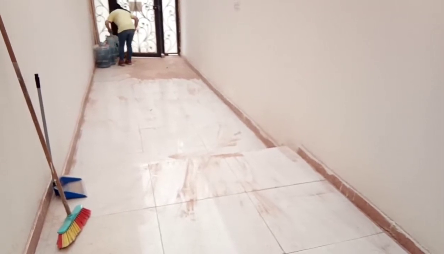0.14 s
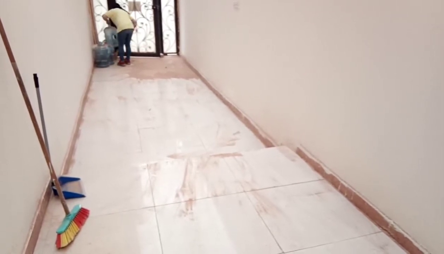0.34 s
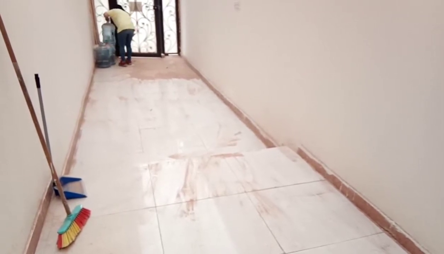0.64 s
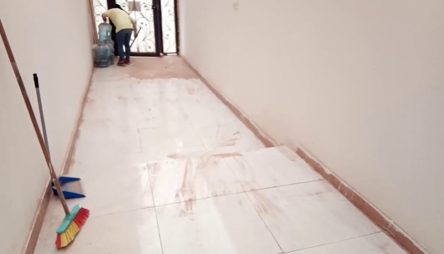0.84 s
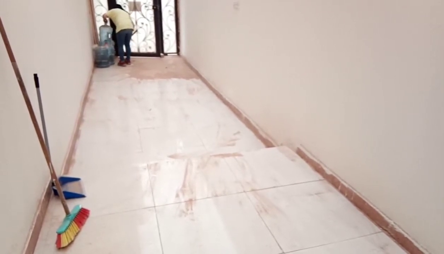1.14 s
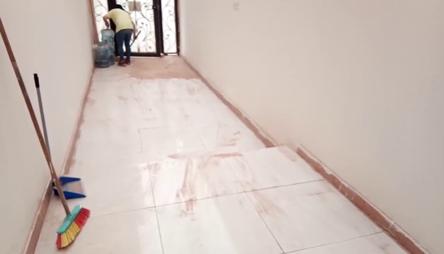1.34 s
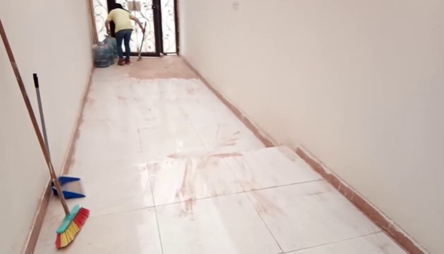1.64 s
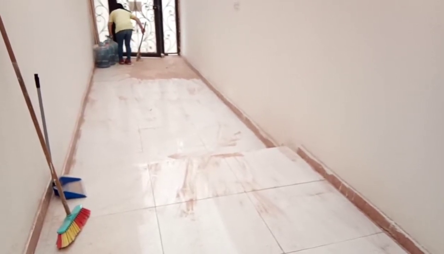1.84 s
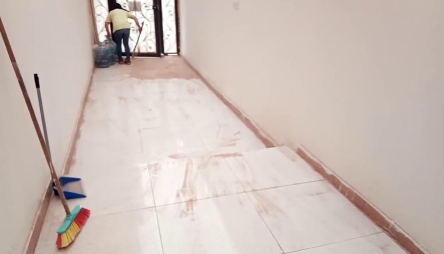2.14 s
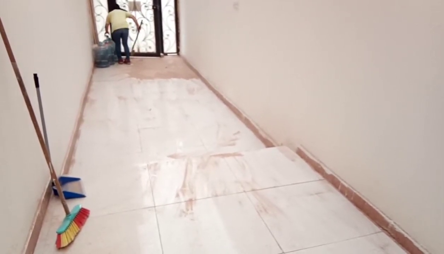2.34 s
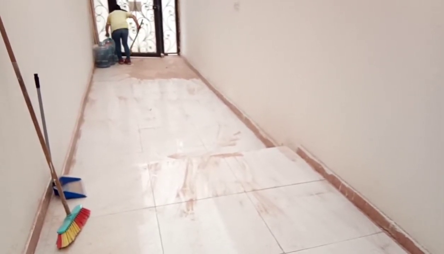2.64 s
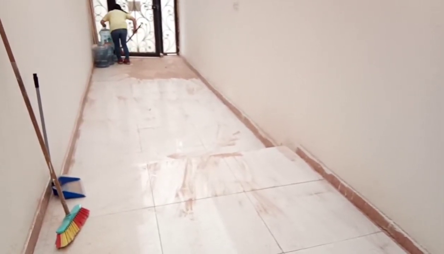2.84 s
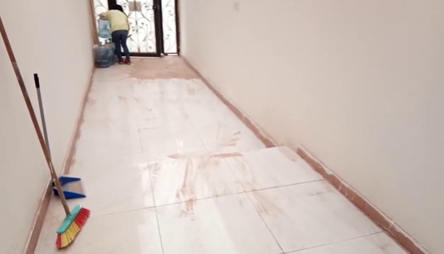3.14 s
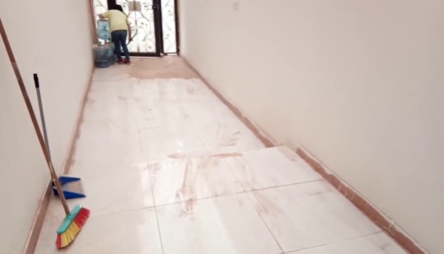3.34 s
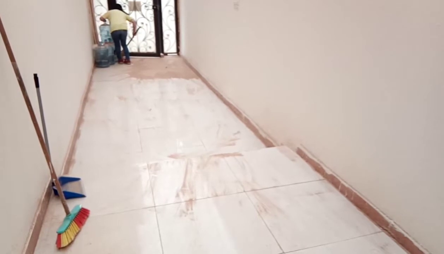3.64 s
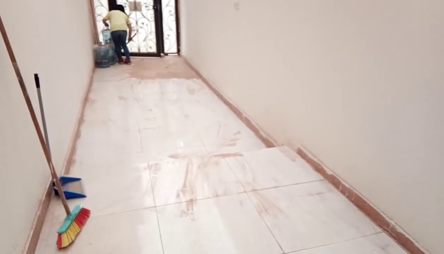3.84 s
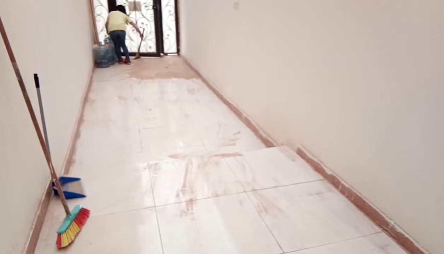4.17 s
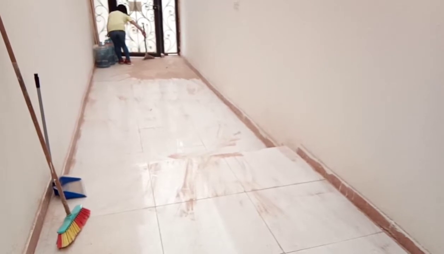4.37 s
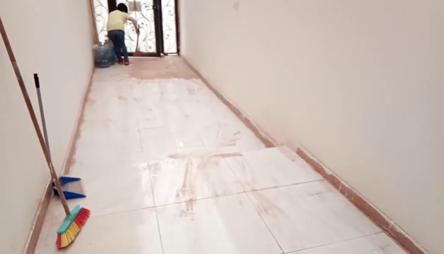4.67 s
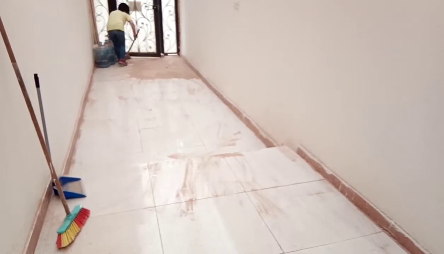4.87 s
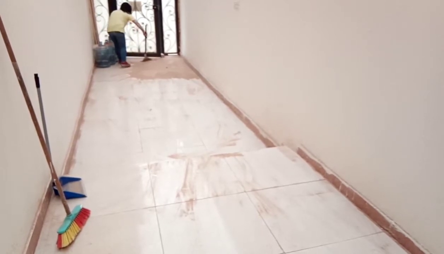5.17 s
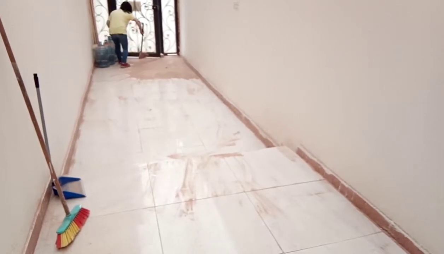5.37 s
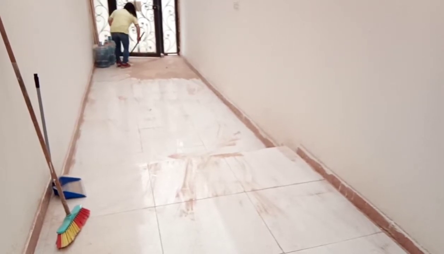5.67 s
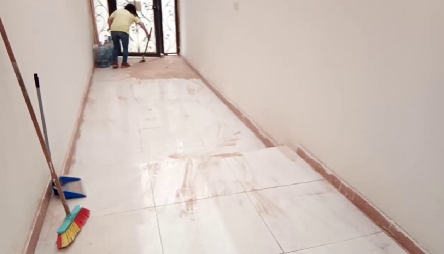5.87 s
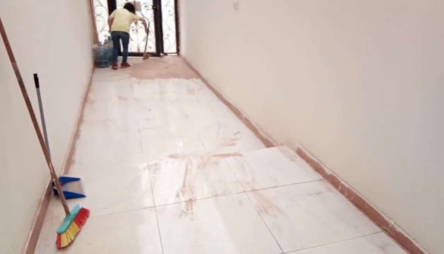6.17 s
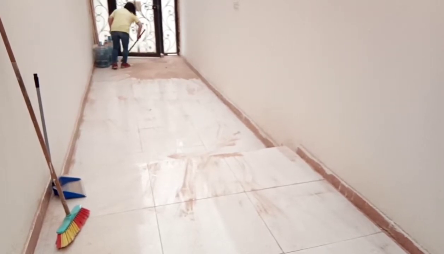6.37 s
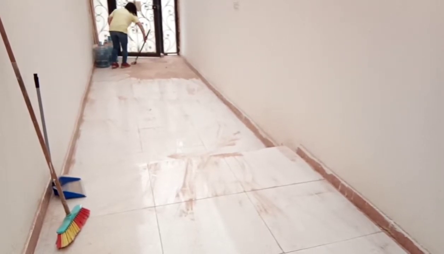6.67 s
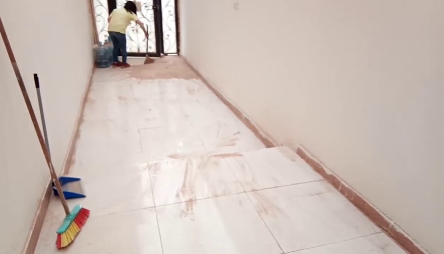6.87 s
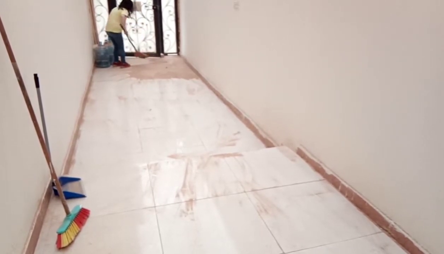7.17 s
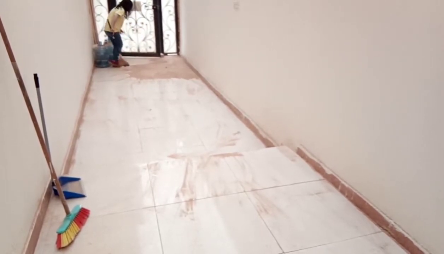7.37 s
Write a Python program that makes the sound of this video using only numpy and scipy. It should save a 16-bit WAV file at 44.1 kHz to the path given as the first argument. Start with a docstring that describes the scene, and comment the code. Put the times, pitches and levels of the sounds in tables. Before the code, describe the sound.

At the far end of a bare tiled hallway, a broom hisses through sand in uneven strokes. A plastic water jug scrapes and knocks hollowly at the start, near two seconds and hardest around four and a half. Sparrows chirp beyond the open door throughout, over faint street murmur. Low wind buffets the microphone, stronger and brighter on the right, while hard walls add a short ring.

```python
"""A broom sweeps sand over tiles at the far end of a bare hallway: streams of grains swell with each stroke.
Beside it a plastic water jug is dragged and knocked: stick-slip clicks ring its walls and hollow body.
Through the open door sparrows chirp in warbling near sines, a cluster of close modes squeaks very high,
and the street murmurs as shaped noise. Hard walls add a long ring to birds, squeak, jug and knocks.
A draught buffets the microphone ports in low noise; the right one is louder and brighter than the left."""
import sys
import numpy as np
from scipy import signal
from scipy.fft import rfft, irfft, next_fast_len
from scipy.io import wavfile

SR = 44100
rng = np.random.default_rng(int(sys.argv[2]) if len(sys.argv) > 2 else 0)


def store_wav(level_fs):
    """Save 16-bit WAV to argv[1]."""
    pcm = np.round(np.clip(np.atleast_2d(level_fs), -1, 1) * 32767)
    wavfile.write(sys.argv[1], SR, pcm.T.astype(np.int16))


def level_to_linear(level):
    """Convert decibel levels to linear amplitude factors, elementwise."""
    exponent = np.asarray(level, float) / 20
    return 10 ** exponent


N = 331191   # length [samples]
PAD = next_fast_len(N + SR)   # transform length [samples], with room for the hallway's ring


# broom strokes on the tiles: (full contact [s], hold [s], relative level [dB], change over the hold [dB],
# landing time for 20 dB [s])
BROOM_STROKES = [(0, 0.48, -61.5, -6, .1), (0.673, 0.055, -55.5, -2, 0.14), (0.98, 0.027, -64.5, 6, 0.32),
                 (1.267, 0.28, -59, -2.5, 0.22), (1.818, 0.088, -66.5, 14.5, 0.14),
                 (2.424, 0.1, -68, -21.5, 0.05), (3.057, 0.44, -56, -11, 0.035),
                 (3.71, 0.23, -66.5, -13, 0.029), (3.993, 0.58, -65, 7, 0.29),
                 (4.918, 0.21, -65.5, 10.5, 0.13), (5.395, 0.024, -83, 17.5, .2),
                 (5.794, 0.21, -58.5, 1.5, 0.17), (6.323, 0.23, -63.5, -22, 0.27),
                 (6.699, 0.12, -57, 0, 0.29)]
# hiss of sand under bristles: (frequency [Hz], relative density [dB])
SAND_SPECTRUM = [(1200, 1.5), (1600, 1.5), (2300, -5), (5700, 13), (8800, 7), (11000, -4), (13200, 7.5),
                 (14600, 1), (15700, -7)]


def broom():
    """Bristles roll thousands of sand grains a second and now and then flick one; the hiss is patchy by band."""
    rolling = grains(9000, spread_db=2.0, channels=2)
    flicked = level_to_linear(-9) * grains(250, spread_db=3.5)
    grit = colour(rolling + flicked, SAND_SPECTRUM)
    edges_hz = np.geomspace(700, 19000, num=7)
    patches_db = 1.2 * drift(14.0, channels=6)
    hiss = 0
    for k, patch_db in enumerate(patches_db):
        band = signal.butter(2, edges_hz[k:k + 2], "band", fs=SR, output="sos")
        # neighbouring bands alternate in sign
        hiss = hiss + (-1) ** k * level_to_linear(patch_db) * signal.sosfilt(band, grit)
    lift_s, rest_db = 0.14, -86   # lift: time for 20 dB
    strokes = [swell(s, db, land_s, lift_s, hold_s, change_db)
               for s, hold_s, db, change_db, land_s in BROOM_STROKES]
    pressure = together([level_to_linear(rest_db)] + strokes)
    unsteady = level_to_linear(2.5 * drift(7.0))
    return pressure * unsteady * rms_one(hiss)


# jug slides over the floor: (time [s], length [s], relative scrape level [dB], relative body level [dB])
JUG_SLIDES = [(0.098, 0.36, -58, -58), (1.894, 0.2, -63, -57.5), (4.374, 0.3, -67, -88)]
# jerks within the slides: (time [s], relative scrape level [dB], relative body level [dB])
JUG_JERKS = [(0.12, -39, -40.5), (0.226, -48, -39), (0.293, -65, -40), (0.399, -49, -36), (1.873, -41, -36),
             (2.04, -48.5, -51), (4.338, -53, -51.5), (4.422, -45.5, -53.5), (4.456, -40.5, -47),
             (4.588, -48.5, -56.5)]
# scrape of plastic on the floor: (frequency [Hz], relative density [dB])
SCRAPE_SPECTRUM = [(300, -42), (450, -16), (620, 18.5), (730, 10.5), (900, 10.5), (1300, 11), (2400, -8.5),
                   (4000, -10), (8000, -33)]
# modes of the jug's walls: (frequency [Hz], width [Hz], relative level [dB])
WALL_MODES = [(630, 30, -14), (892, 37, 14.5), (953, 13, 14), (1290, 37, -21), (1563, 79, 0.5),
              (1800, 38, 6)]
# modes of the hollow body: (frequency [Hz], width [Hz], relative level [dB])
BODY_MODES = [(305.7, 3.8, 2.5), (198.2, 17, -8), (261.3, 29, -7)]


def jug():
    """Stick-slip clicks under the jug sound as a scrape, ring in its walls and set its hollow body humming."""
    slips = grains(2200 * level_to_linear(3 * drift(40)), spread_db=4.5)[0]
    # each wall mode comes and goes as the contact shifts
    contacts = level_to_linear(4 * drift(2.5, channels=len(WALL_MODES)))
    walls = sum(level_to_linear(db) * resonate(slips * contact, hz, width_hz)
                for (hz, width_hz, db), contact in zip(WALL_MODES, contacts))
    rubbing = rms_one(colour(slips, SCRAPE_SPECTRUM))
    scrape = rms_one(rubbing + level_to_linear(-6) * rms_one(walls))
    body = rms_one(sum(level_to_linear(db) * resonate(slips, hz, width_hz) for hz, width_hz, db in BODY_MODES))
    grab_s, jerk_fade_s, slide_fade_s = 0.011, 0.036, 0.2   # times for 20 dB
    out = 0
    for k, sound in enumerate((scrape, body)):
        slides = [swell(s, dbs[k], grab_s, slide_fade_s, length_s) for s, length_s, *dbs in JUG_SLIDES]
        jerks = [swell(s, dbs[k], grab_s, jerk_fade_s) for s, *dbs in JUG_JERKS]
        out = out + sound * together(slides + jerks)
    return out


# hard knocks beside the broom: (time [s], relative level [dB], lowest frequency of the crack [Hz])
HARD_KNOCKS = [(0.112, -51, 1300), (0.2304, -49, 2500), (0.295, -44.5, 4300), (0.36, -59, 3500),
               (0.424, -50, 4600), (1.861, -41, 900), (2.022, -42, 2580), (2.431, -58, 3400),
               (4.3363, -62, 900), (4.419, -39.5, 2520), (4.45, -33.5, 885), (4.58, -38, 2460),
               (5.4223, -57, 1810), (7.107, -62, 1800)]


def knocks():
    """Gritty cracks that build over a few ms and die within some tens; each crack reaches down to its own
    lowest frequency."""
    build_s, t60_s = .004, .045
    t = np.arange(SR // 8) / SR
    shape = np.minimum(t / build_s, 1) * level_to_linear(-60 * np.maximum(t - build_s, 0) / t60_s)
    grit = grains(4000 * level_to_linear(6 * drift(150)), spread_db=2.5)[0]
    out = np.zeros(N + SR)
    for s, db, low_hz in HARD_KNOCKS:
        i = round(s * SR)
        band = signal.butter(2, [low_hz, 12000], "band", fs=SR, output="sos")
        crack = signal.sosfilt(band, grit[i:i + len(t)])
        out[i:i + len(t)] += level_to_linear(db) * shape * rms_one(crack)
    return out[:N]


# long rough calls outside the door: (time [s], relative level [dB], top pitch [Hz],
# relative level of the buzz that joins in [dB])
CHEEP_CALLS = [(-0.125, -49, 5200, -46), (0.982, -56, 5323, -65.5), (1.858, -54.5, 5430, -62),
               (3.065, -53, 5350, -60), (5.058, -56, 5176, -66), (5.942, -51.5, 5324, -67.5),
               (6.743, -51.5, 5374, -63.5)]
# single notes outside the door, by kind: (time [s], relative level [dB], top pitch [Hz])
ARCH_NOTES = [(.538, -73, 5180), (0.763, -68, 4830), (.81, -67, 4750), (0.897, -65, 5340),
              (.922, -60, 4420), (1.02, -59.5, 4380), (1.447, -68.5, 4800), (1.753, -70, 6730),
              (1.795, -72, 5210), (1.955, -61, 4300), (2.792, -54.5, 5340), (2.888, -61, 4600),
              (2.943, -69, 4620), (3.718, -56.5, 5220), (3.81, -63.5, 4290), (3.81, -67, 7600),
              (4.068, -61, 5930), (4.152, -66.5, 4680), (4.375, -71, 4900), (5.006, -63.5, 4640),
              (5.52, -68, 4670), (5.59, -63.5, 4970), (5.68, -68.5, 4540), (5.534, -61, 5240),
              (5.762, -77, 5100), (6.556, -65.5, 4870), (6.6, -68, 4320), (6.655, -67, 4470)]
SLUR_NOTES = [(0.289, -57, 6540), (0.578, -66, 7330), (0.867, -66, 7480), (0.939, -58, 7550),
              (0.968, -55, 7350), (1.253, -62, 7300), (1.831, -56, 7300), (2.465, -66, 7100),
              (2.499, -64, 7480), (3.01, -68.5, 7600), (3.488, -64, 4820), (3.775, -60, 6940),
              (4.515, -62, 4500), (4.687, -66, 4780), (4.741, -71, 4810), (6.338, -71, 7570),
              (6.368, -78, 7800), (6.393, -63.5, 7500)]
WHISTLE_NOTES = [(7.315, -79.5, 2540)]
# high notes sung twice: (time [s], relative level [dB], top pitch [Hz], relative level of the repeat [dB])
TWIN_NOTES = [(0.675, -60, 6340, -64), (1.37, -57, 6030, -62), (2.691, -66, 5940, -66),
              (3.397, -60.5, 5880, -64.5), (4.577, -52.5, 6690, -106), (4.905, -58, 6100, -61.5),
              (5.436, -59.5, 6020, -62), (6.255, -63.5, 6160, -60.5)]
# course of each kind of note: (time into the note [s], share of the top pitch [ratio], relative level [dB])
CHEEP_SHAPE = [(0, .83, -1), (.008, .985, 0), (.02, 1, 1), (.028, .94, 4), (.045, .91, 2), (.056, .96, 1),
               (.085, .89, -1), (.13, .882, -4), (.2, .87, -15)]
BUZZ_SHAPE = [(0, 0.94, 7), (0.021, 0.94, 1.5), (0.07, 0.68, 10)]
ARCH_SHAPE = [(0, .79, -3), (.008, .96, -1), (.015, 1, 1), (.023, .95, -1), (.037, .76, -6)]
SLUR_SHAPE = [(0, .91, -3), (.011, 1, 0.5), (0.026, .975, -10)]
WHISTLE_SHAPE = [(0, 1, -2), (.18, 1, 0)]
TWIN_SHAPE = [(0, .86, -6), (.008, 1, 0), (.013, .98, 0), (.025, .86, -4)]


def sparrows():
    """Six kinds of note, near sines on falling, arched or level pitch, from the birds outside the door."""
    # the buzz enters late, above the cheep's top
    buzzes = [(s + 0.042, buzz_db, 1.4 * hz) for s, db, hz, buzz_db in CHEEP_CALLS]
    repeats = [(s + 0.053, repeat_db, 1.015 * hz) for s, db, hz, repeat_db in TWIN_NOTES]
    clear = .009   # warble as a share of the pitch; the rough kinds have more
    rough = sing(CHEEP_CALLS, CHEEP_SHAPE, 0.038) + sing(buzzes, BUZZ_SHAPE, 0.04)
    arches = sing(ARCH_NOTES, ARCH_SHAPE, clear)
    twins = sing(TWIN_NOTES + repeats, TWIN_SHAPE, clear)
    slurs = sing(SLUR_NOTES, SLUR_SHAPE, clear)
    whistles = sing(WHISTLE_NOTES, WHISTLE_SHAPE, 0.0306)
    return rough + arches + twins + slurs + whistles


def sing(notes, shape, warble):
    """Near sines that follow one pitch shape, scaled to each note's top, with an uneven warble."""
    warble_hz, settle_s = 114.5, .15   # the pitch warble calms down in the course of a note
    lead = SR   # room for notes that begin before the start
    out = np.zeros(N + 2 * SR)
    when, pitch, level_db = np.transpose(shape)
    t = np.arange(round(when[-1] * SR)) / SR
    wobble = drift(warble_hz, channels=2)
    edges = np.minimum(t / .0015, 1) * np.minimum((t[-1] - t) / .003, 1)
    for s, db, top_hz, *_ in notes:
        i = round(s * SR)
        shake, flutter = np.take(wobble, i + np.arange(len(t)), axis=1, mode="wrap")
        hz = top_hz * np.interp(t, when, pitch) * (1 + warble * np.exp(-t / settle_s) * shake)
        # rougher notes also flutter more in level
        level = level_to_linear(db + np.interp(t, when, level_db) + 100 * warble * flutter)
        note = level * edges * np.sin(2 * np.pi * np.cumsum(hz) / SR)
        out[lead + i:lead + i + len(t)] += np.sqrt(2) * note
    return out[lead:lead + N]


# soft bursts of the squeak: (time [s], relative level [dB])
SQUEAK_BURSTS = [(5.906, -58), (6.035, -55.5), (6.1314, -48), (6.1526, -50.5)]


def squeak():
    """A very high cluster of modes, set off in short soft bursts; they beat, so it flutters as it dies."""
    centre_hz, spread_hz, t60_s = 14270, 35, .45
    bursts = resonate(resonate(clicks(SQUEAK_BURSTS), centre_hz, 200), centre_hz, 200)
    r = level_to_linear(-60 / (t60_s * SR))
    out = 0
    for hz in centre_hz + spread_hz * rng.standard_normal(size=16):
        w = 2 * np.pi * hz / SR
        mode = signal.lfilter([0, np.sin(w)], [1, -2 * r * np.cos(w), r * r], bursts)
        out = out + rng.choice([-1, 1]) * mode
    return level_to_linear(-14.5) * out


# gusts on the microphone ports: (time [s], relative level [dB], rise for 20 dB [s], fall for 20 dB [s])
DRAUGHT_GUSTS = [(0, -46.5, .1, 0.41), (.08, -41, 0.017, 0.85), (0.749, -36, 0.17, 0.17),
                 (1.4, -50.5, 1, 1.5), (1.899, -42, 0.019, 0.59), (3.61, -40.5, 0.46, 0.72),
                 (4.37, -43.5, 0.09, 0.73), (5.287, -41, 0.15, 0.2), (5.698, -43.5, 0.067, 0.041),
                 (7.19, -49, 0.1, 0.33)]
# single buffets on the ports: (time [s], relative level [dB])
DRAUGHT_PUFFS = [(0.081, -31.5), (1.883, -34), (2.315, -44.5), (3.445, -40), (3.495, -47), (3.572, -32.5),
                 (3.604, -36), (3.693, -35.5), (3.779, -40), (3.881, -45.5), (4.062, -40), (4.419, -45)]
# rumble of air at the ports: (frequency [Hz], relative density [dB])
BUFFET_SPECTRUM = [(25, -52), (45, -14.5), (75, 0.5), (105, 3), (175, -6.5), (330, -21.5), (600, -88)]


def draught():
    """Lumpy low noise, each port its own, stronger on the right; buffets are single low swings."""
    noise = rng.standard_normal((2, N)) * level_to_linear(3.24 * drift(23.0, channels=2))
    lumps = rms_one(colour(noise, BUFFET_SPECTRUM))
    lull_db = -59
    gusts = together([level_to_linear(lull_db)] + [swell(*gust) for gust in DRAUGHT_GUSTS])
    swings = resonate(resonate(clicks(DRAUGHT_PUFFS), 170, 40), 130.0, 39)
    swings = swings * level_to_linear(max(db for s, db in DRAUGHT_PUFFS)) / swings.max()
    # left and right port [dB]
    return gusts * lumps * level_to_linear([[-5], [3]]) + swings * level_to_linear([[-14], [3]])


# far, nearly steady murmur outdoors: (frequency [Hz], relative density [dB])
STREET_SPECTRUM = [(120, 2), (200, -3), (496, -4.5), (951, -6.5), (2850, -26.5), (4680, -24), (5940, -28),
                   (12000, -93), (15600, -92), (22000, -120)]


def street():
    """Far traffic and air through the doorway: shaped noise, unrelated at the two ports."""
    murmur = rms_one(colour(rng.standard_normal((2, N)), STREET_SPECTRUM))
    return level_to_linear(-62 + 0.55 * drift(29.0)) * murmur


# ring of the bare hallway: (frequency [Hz], time to fall 60 dB [s])
HALL_RING = [(200, 0.73), (1000, 0.2), (4000, 0.51), (9000, 0.087), (15000, 0.019)]


def hallway(x, direct_db):
    """Direct sound, reaching the left port first, plus a dense tail of unit energy dying octave by octave."""
    right_lag = 28   # [samples]
    t = np.arange(SR) / SR
    tail = 0
    for low_hz in 60 * 2. ** np.arange(8):
        band = signal.butter(2, [low_hz, min(2 * low_hz, .45 * SR)], "band", fs=SR, output="sos")
        t60_s = at_hz(HALL_RING, np.sqrt(2) * low_hz)
        dying = signal.sosfilt(band, rng.standard_normal((2, SR))) * level_to_linear(-60 * t / t60_s)
        tail = tail + dying * np.minimum(t / 0.012, 1)   # builds up over 12 ms
    tail = tail / np.sqrt(np.sum(tail ** 2) / 2)
    tail[1, right_lag] += level_to_linear(direct_db)
    tail[0, 0] += level_to_linear(direct_db)
    return irfft(rfft(x, PAD) * rfft(tail, PAD), PAD)[:, :N]


def rms_one(x):
    """Scales to rms 1."""
    return x / np.sqrt(np.mean(x ** 2) + 1e-20)


def at_hz(points, hz):
    """Reads a (frequency [Hz], value) table on a log axis."""
    table_hz, values = np.array(points).T
    return np.interp(np.log(np.maximum(hz, 1)), np.log(table_hz), values)


def colour(x, spectrum):
    """Shapes a signal by a spectrum in dB."""
    gain = level_to_linear(at_hz(spectrum, np.fft.rfftfreq(PAD, 1 / SR)))
    return irfft(rfft(x, PAD) * gain, PAD)[..., :N]


def drift(rate, channels=1):
    """Slow chance with spread 1: noise through a two-pole low-pass, drawn every 40 samples."""
    r = np.exp(-80 * np.pi * rate / SR)
    noise = rng.standard_normal((channels, N // 40 + 2002))
    slow = signal.lfilter([1], [1, -2 * r, r * r], noise)[:, 2000:]   # drop the run-in
    return np.array([np.interp(np.arange(N) / 40, np.arange(len(s)), rms_one(s)) for s in slow])


def grains(per_s, spread_db, channels=1):
    """Random clicks of uneven size; rms 1."""
    sizes = level_to_linear(spread_db * np.minimum(rng.exponential(1, (channels, N)), 5))
    signs = rng.choice([-1, 1], (channels, N))
    struck = rng.random((channels, N)) < per_s / SR
    return rms_one(sizes * signs * struck)


def clicks(rows):
    """A click of each row's level at each row's time."""
    out = np.full(N, 1e-18)
    for s, db, *_ in rows:
        out[min(round(s * SR), N - 1)] = level_to_linear(db)
    return out


def resonate(x, hz, width_hz):
    """Two-pole resonance with gain 1 on top."""
    r = np.exp(-np.pi * width_hz / SR)
    feed = np.array([1, 0, -1]) * (1 - r * r) / 2
    return signal.lfilter(feed, [1, -2 * r * np.cos(2 * np.pi * hz / SR), r * r], x)


def swell(s, db, rise_s, fall_s, hold_s=0, change_db=0):
    """Gain of one event: 20 dB up in rise_s, a hold that drifts by change_db, 20 dB down in fall_s."""
    t = np.arange(N) / SR - s
    rise = 20 * np.minimum(t, 0) / rise_s
    held = change_db * np.clip(t / (hold_s + 1e-6), 0, 1)
    fall = 20 * np.maximum(t - hold_s, 0) / fall_s
    return level_to_linear(db + rise + held - fall)


def together(gains):
    """Unrelated pushes add in power."""
    return np.sqrt(sum(g ** 2 for g in gains))


def scene():
    """All sources at the two ports; birds, squeak, jug and knocks ring down the hallway."""
    outside = hallway(sparrows() + squeak(), direct_db=3.5)
    at_door = hallway(jug() + knocks(), direct_db=-0.5)
    return broom() + at_door + outside + draught() + street()


def low_pass(x):
    """Removes everything above the highest recorded frequency."""
    return signal.sosfilt(signal.butter(12, 16540, fs=SR, output="sos"), x)


# covered left microphone port: (frequency [Hz], gain [dB])
LEFT_PORT = [(100, -4), (1000, -4), (4500, -5), (8000, -8), (10500, -14), (12500, -26), (15000, -26)]
# open right microphone port, ringing near the top: (frequency [Hz], gain [dB])
OPEN_PORT = [(11000, -0.5), (13300, -12.5), (14800, 12)]


def record(dry):
    """The left port is covered and dull, with a faint high hiss of its own; the top is cut."""
    treble = signal.butter(2, 11000, "high", fs=SR, output="sos")
    hiss = signal.sosfilt(treble, rng.standard_normal(N))
    left = colour(dry[0], LEFT_PORT) + level_to_linear(-90.0) * hiss
    right = colour(dry[1], OPEN_PORT)
    top_cut = signal.cheby2(20, 60, 15900, fs=SR, output="sos")
    mix = level_to_linear(4.0) * signal.sosfilt(top_cut, np.array([left, right]))
    return low_pass(mix)


dry = scene()
out = record(dry)
store_wav(out)
```